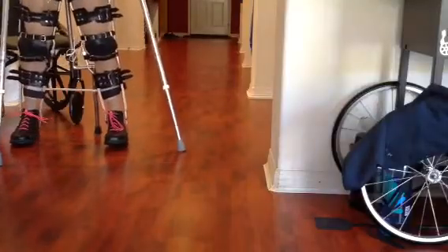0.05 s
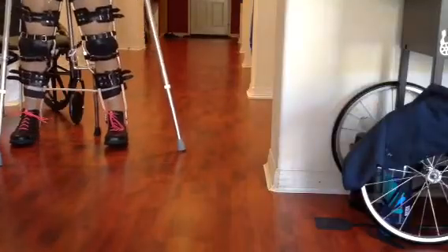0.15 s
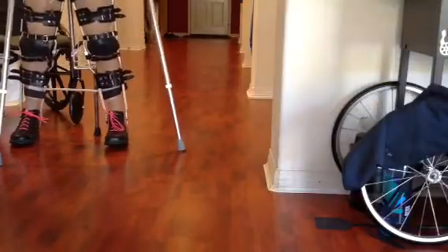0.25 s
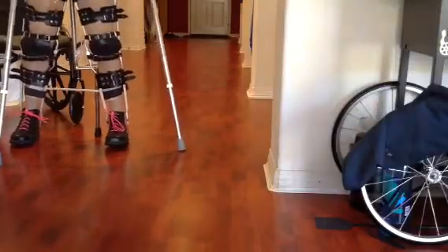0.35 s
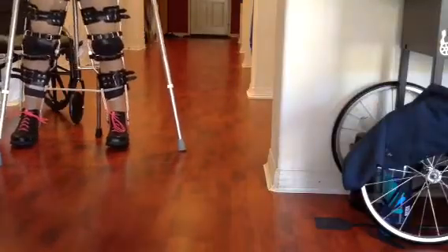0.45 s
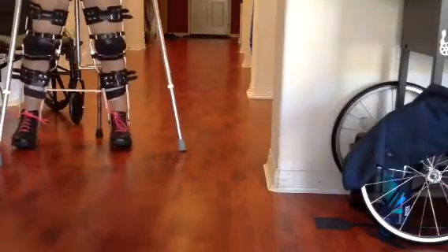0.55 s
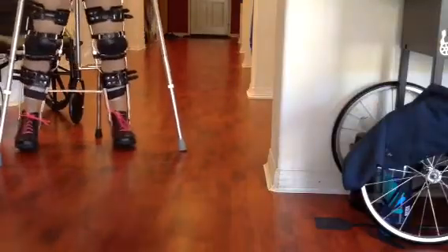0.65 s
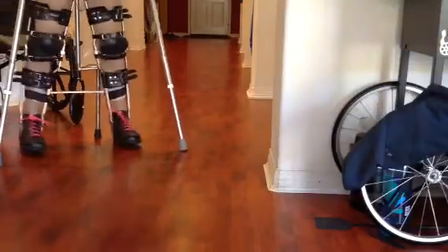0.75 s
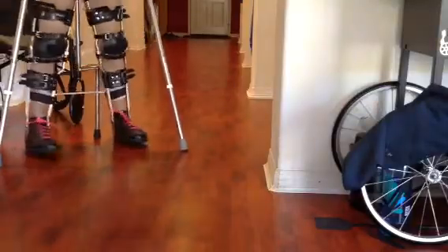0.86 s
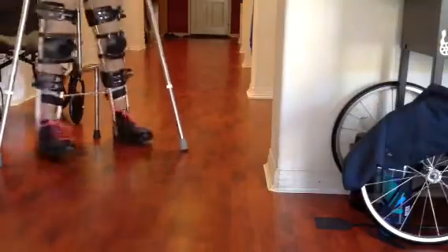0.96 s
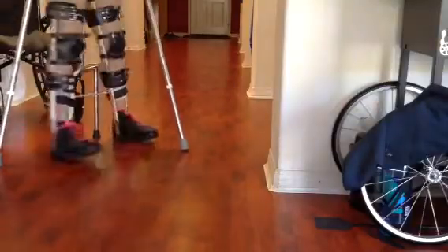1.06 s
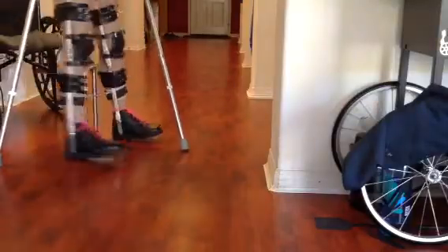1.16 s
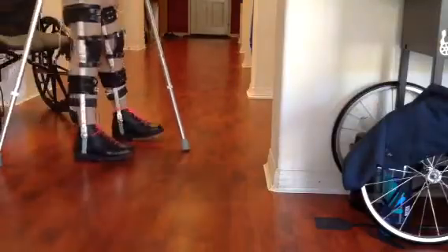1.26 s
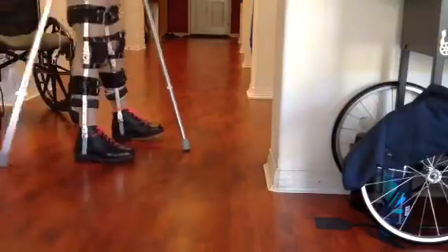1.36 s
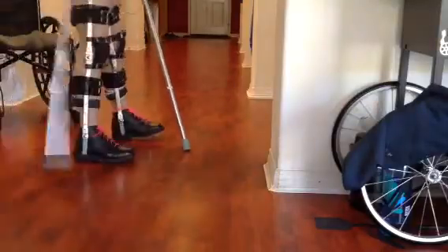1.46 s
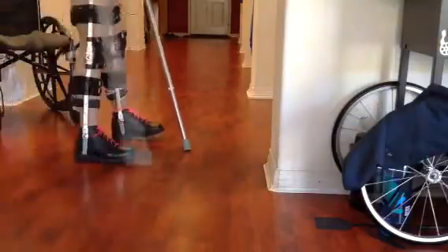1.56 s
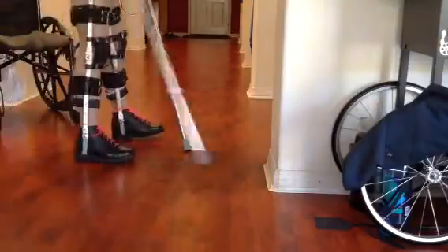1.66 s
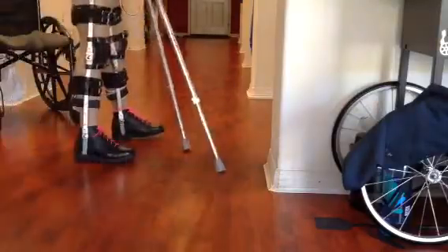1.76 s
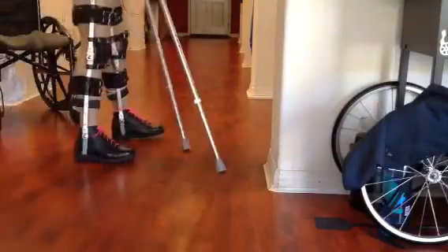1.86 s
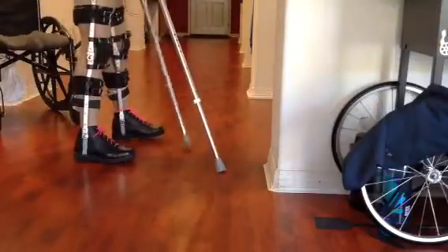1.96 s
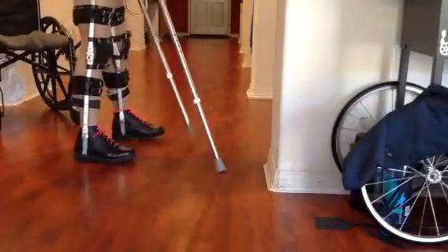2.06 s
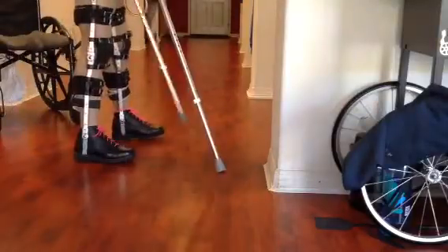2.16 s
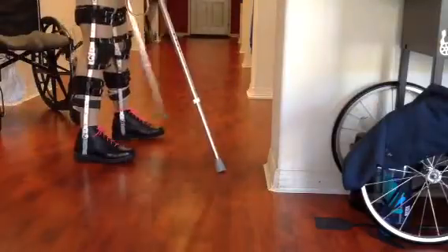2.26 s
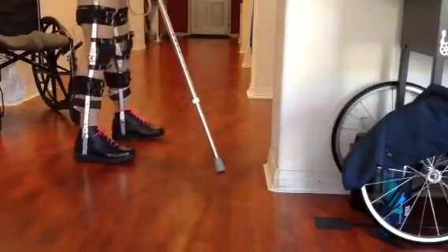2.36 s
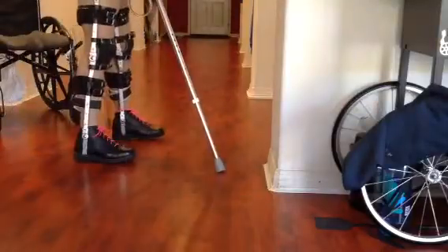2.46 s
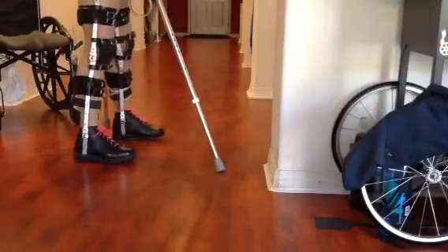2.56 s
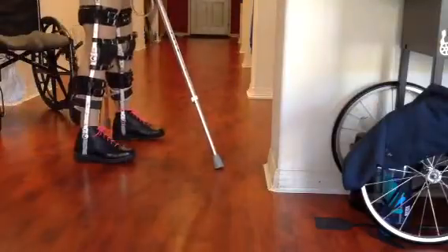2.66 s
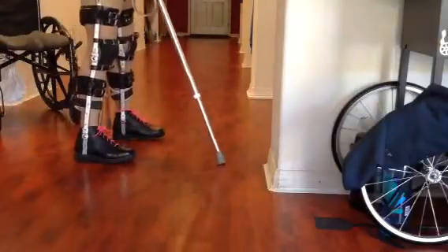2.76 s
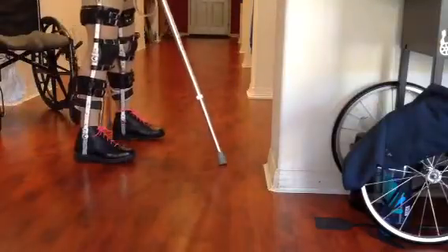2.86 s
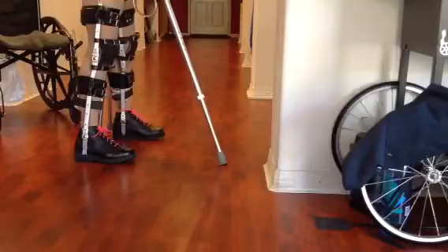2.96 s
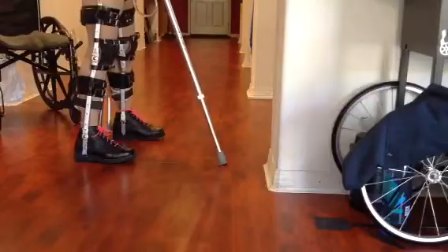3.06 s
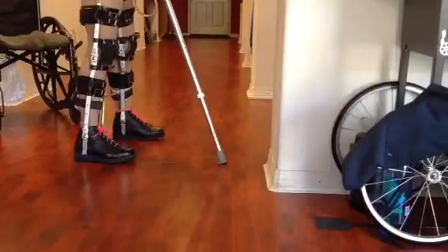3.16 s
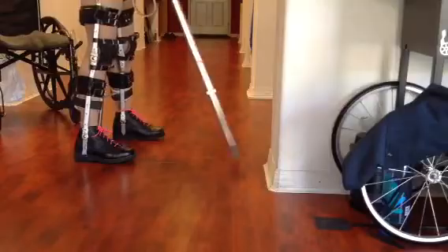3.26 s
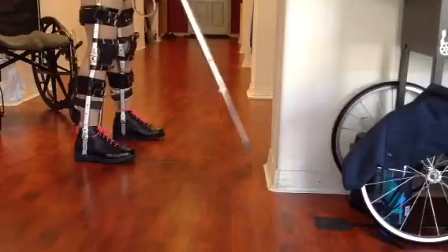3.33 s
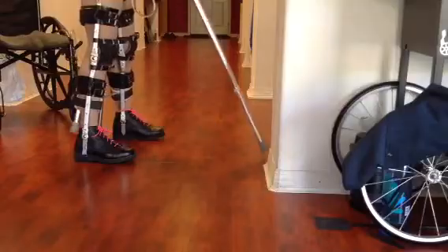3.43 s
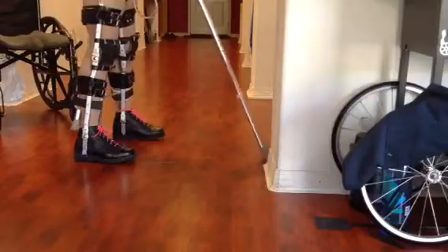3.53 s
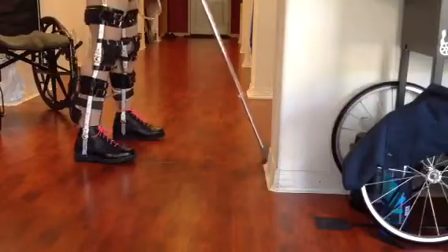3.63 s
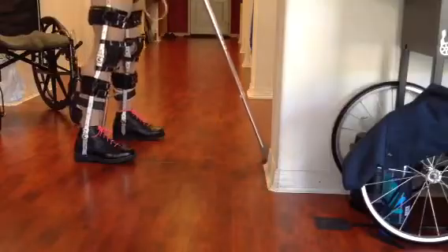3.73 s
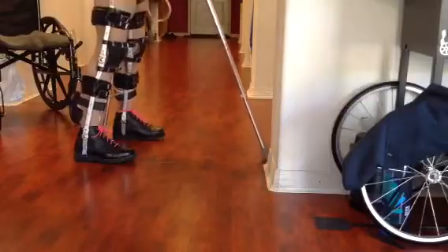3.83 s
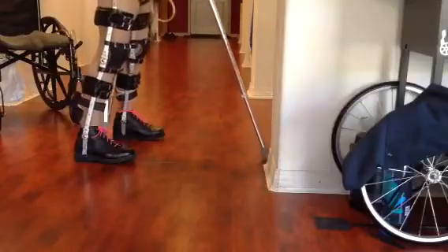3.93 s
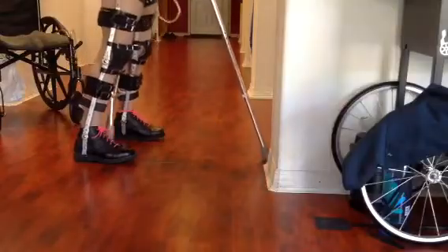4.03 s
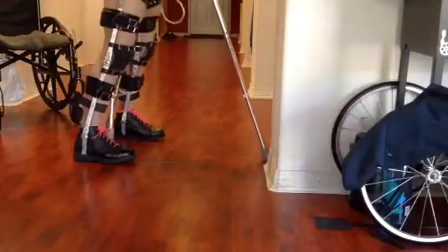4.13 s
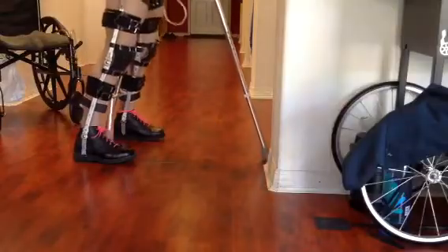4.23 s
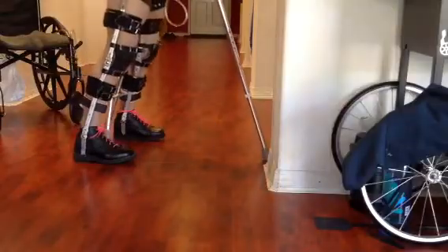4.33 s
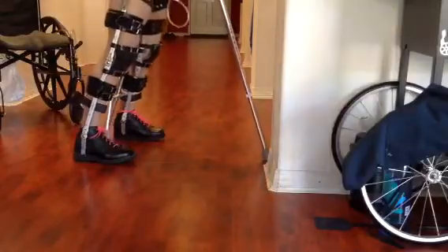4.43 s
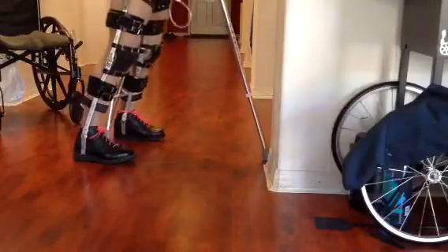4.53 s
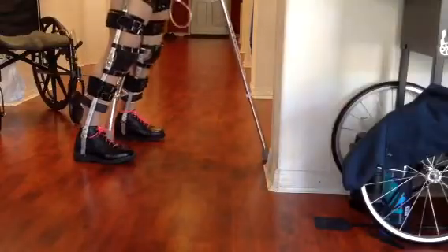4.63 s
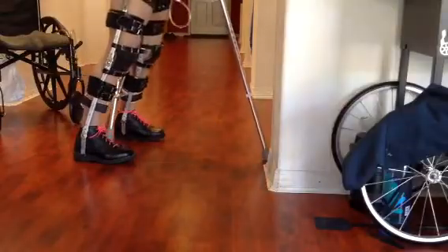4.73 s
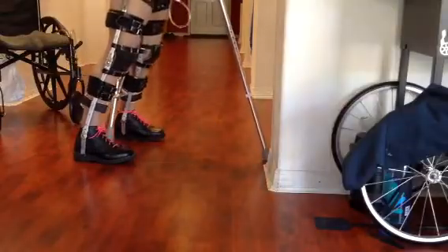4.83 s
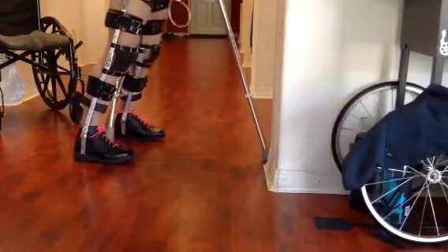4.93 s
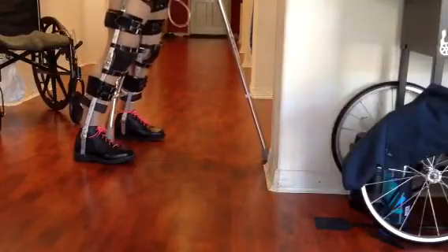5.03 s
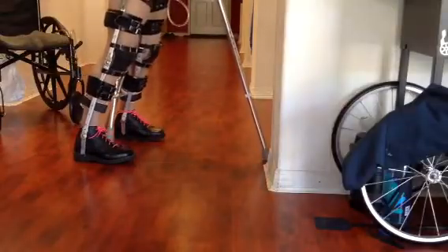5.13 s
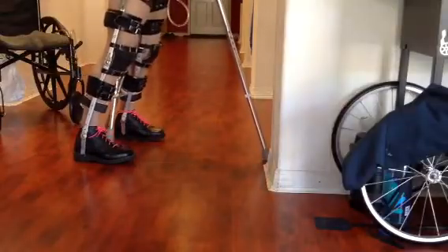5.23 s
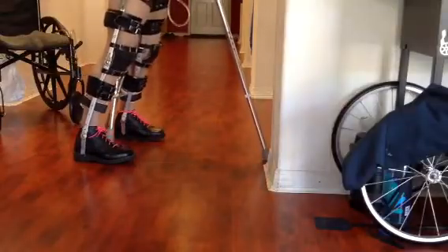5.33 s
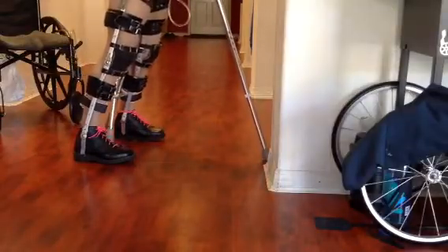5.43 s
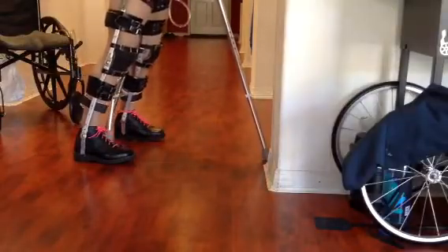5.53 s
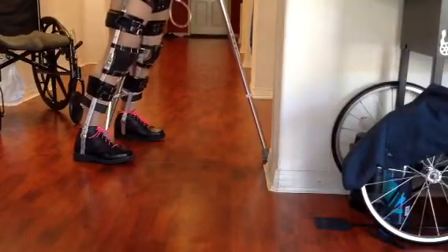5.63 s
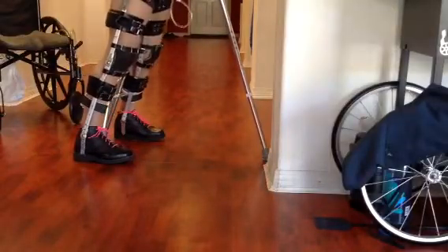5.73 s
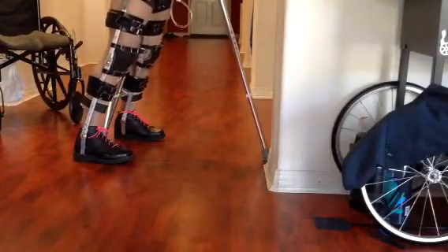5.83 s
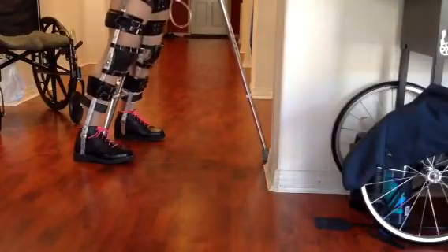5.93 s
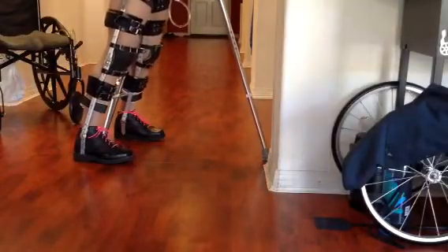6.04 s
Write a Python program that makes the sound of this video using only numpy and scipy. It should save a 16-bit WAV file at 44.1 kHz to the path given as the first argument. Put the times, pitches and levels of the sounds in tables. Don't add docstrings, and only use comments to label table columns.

```python
import sys
import numpy as np
from scipy import signal
from scipy.fft import rfft, irfft, next_fast_len
from scipy.io import wavfile
from scipy.ndimage import uniform_filter1d, map_coordinates

SR = 44100
rng = np.random.default_rng(int(sys.argv[2]) if len(sys.argv) > 2 else 0)


def gain_from_decibels(decibels):
    exponent = np.asarray(decibels, float) / 20
    return 10 ** exponent


def wav_record(signal):
    frames = np.transpose(np.atleast_2d(signal))
    bounded = np.clip(frames, -1, 1)
    quanta = np.round(bounded * 32767).astype(np.int16)
    wavfile.write(sys.argv[1], SR, quanta)


N = 268569


def unit(x):
    return x / np.sqrt(np.mean(x ** 2) + 1e-20)


def peak1(x):
    return x / np.abs(x).max()


def along(points, hz):
    f, v = np.transpose(points)
    return np.interp(np.log(hz + 1), np.log(f + 1), v)


def filtered(x, response):
    m = next_fast_len(len(x) + 8192)
    hz = np.fft.rfftfreq(m, 1 / SR)
    return irfft(rfft(x, m) * response(hz), m)[:len(x)]


def resonance(f, hz, width_hz):
    return 1j * f * width_hz / (hz * hz - f * f + 1j * f * width_hz)


def modes(table):
    def response(f):
        return sum((-1) ** k * gain_from_decibels(db) * resonance(f, hz, w) for k, (hz, w, db) in enumerate(table))
    return response


def add(track, s, sound):
    part = track[round(s * SR):][:len(sound)]
    part += sound[:len(part)]


# (frequency [Hz], t60 [s])
HALLWAY_T60 = [(150, 0.42), (500, 0.74), (1500, 0.69), (4000, 0.64), (9000, 0.58), (15000, 0.44)]


def hall(x, build_s=0.007):
    hz, t, z = signal.stft(rng.standard_normal(SR * 3 // 5), SR, nperseg=256)
    decay_db = -60 * t / along(HALLWAY_T60, hz)[:, None]
    tail = signal.istft(z * gain_from_decibels(decay_db), SR, nperseg=256)[1]
    tail = tail * (1 - np.exp(-(np.arange(len(tail)) / SR / build_s) ** 2))
    return signal.fftconvolve(x, tail / np.linalg.norm(tail))


# (frequency [Hz], level per Hz [dB])
HUM_COLOUR = [(24, -69), (40, -22.5), (161, 0), (320, -5), (780, -16.5), (1150, -18), (5660, -25),
              (15300, -25.5)]
# (frequency [Hz], level [dB])
FRIDGE_TONES = [(277, -71), (457, -87.5)]


def house():
    t = np.arange(N) / SR
    air = unit(filtered(rng.standard_normal(N), lambda f: gain_from_decibels(along(HUM_COLOUR, f))))
    drift = np.clip(map_coordinates(rng.standard_normal(60), [t * 8]), -1.5, 1.5)
    out = gain_from_decibels(-61.5) * air
    for hz, db in FRIDGE_TONES:
        out += gain_from_decibels(db + 3 * drift) * np.sin(2 * np.pi * hz * t + 1.2 * drift)
    return out


def load(s, held_s, rise_share):
    slacken_db_per_s = 263
    t = np.arange(N) / SR - s
    rise = np.sin(np.pi / 2 * np.clip(t / (rise_share * held_s), 0, 1)) ** 2
    return rise * gain_from_decibels(-slacken_db_per_s * np.maximum(t - held_s, 0))


def patchy(x, depth_db):
    z = signal.stft(x, nperseg=512)[2]
    field = uniform_filter1d(rng.standard_normal(z.shape), size=8, axis=0)
    field = uniform_filter1d(field, size=8, axis=1)
    return signal.istft(z * gain_from_decibels(depth_db * unit(field)), nperseg=512)[1][:N]


# (frequency [Hz], width [Hz], level [dB])
LEATHER_MODES = [(1100, 1200, -27), (1750, 1150, 29), (2820, 4500, -9)]
# (frequency [Hz], width [Hz], level [dB])
BUCKLE_MODES = [(2550, 550, 1), (4400, 900, 1), (5900, 800, -2), (8500, 2000, -10)]
# (time [s], held [s], creak level [dB], rasp re creak [dB], groan re creak [dB])
STRAP_STRAINS = [(0.0, 0.033, -66.5, 2, 3), (.322, 0.089, -68.5, -6, 2), (.446, 0.2, -66.5, -4.5, -1.5),
                 (0.802, 0.24, -68, -3.5, -3.5), (1.46, 0.15, -65, -3, -10), (2.672, 0.046, -69, -23, 5.5),
                 (3.43, 0.24, -62.5, 1.5, -7), (3.64, 0.018, -68, -19, -5), (3.8, 0.18, -62.5, -2.5, -2.5),
                 (4.248, 0.011, -58.5, 4.5, 6.5), (4.324, 0.025, -64.5, 9, 9), (4.53, 0.047, -62.5, 0, 4),
                 (4.66, 0.023, -62, 4.5, 3), (5.035, 0.027, -53.5, -4, -4), (5.878, 0.02, -64, -2, -4)]
STRAP_LEANS = [(3.237, 0.041, -59.5, 5.5, -10), (4.41, 0.041, -55, -0.5, 1), (4.756, 0.068, -42.5, 0, -10),
               (5.089, 0.061, -47, -1.6, -11.5), (5.17, 0.059, -46, -4.8, -13)]
# (time [s], held [s], level [dB])
CLOTH_BRUSHES = [(.05, .03, -77), (.6, .15, -70), (3.64, 0.015, -56.5), (4.29, 0.11, -61),
                 (4.66, 0.023, -65)]


def straps():
    slips_per_s, spread_db, fizz_db, hallway_db = 1400, 4, -19.5, 2
    sudden, slow = 0.093, 0.8
    sizes = gain_from_decibels(spread_db * np.clip(rng.standard_normal((4, N)), -2, 2)) * rng.choice([-1, 1], (4, N))
    slips = (rng.random(N) < slips_per_s / SR) * sizes

    levels = np.zeros((4, N))
    for rise_share, rows in [(sudden, STRAP_STRAINS), (slow, STRAP_LEANS)]:
        for s, held_s, creak_db, rasp_db, groan_db in rows:
            voice_db = creak_db + np.array([[0], [rasp_db], [groan_db], [fizz_db]])
            levels += gain_from_decibels(voice_db) * load(s, held_s, rise_share)
    for s, held_s, db in CLOTH_BRUSHES:
        levels[-1] += gain_from_decibels(db) * load(s, held_s, sudden)

    creak = lambda f: modes(LEATHER_MODES)(f) * resonance(f, 1700, 1900)
    rasp = lambda f: modes(BUCKLE_MODES)(f) * resonance(f, 3500, 15000)
    groan = lambda f: resonance(f, 820, 1180) ** 2
    fizz = lambda f: resonance(f, 12800, 8300) ** 2
    dry = np.zeros(N)
    for level, jerks, voice in zip(levels, slips, [creak, rasp, groan, fizz]):
        dry += level * unit(filtered(jerks, voice))
    return gain_from_decibels(-5) * patchy(dry + gain_from_decibels(hallway_db) * hall(dry)[:N], 1.4)


# (delay [s], level [dB])
NEAR_BOUNCES = [
    (.0008, 0),
    (.0016, -4),
    (.0026, -9),
]


def strike(out, s, db, response, hallway_db):
    impulse = 1.0 * (np.arange(SR // 20) == 0)
    hit = gain_from_decibels(db) * peak1(filtered(impulse, response))
    add(out, s, hit)
    for delay_s, bounce_db in NEAR_BOUNCES:
        late, vary = rng.standard_normal(2)
        add(out, s + delay_s * (1 + 0.12 * late), gain_from_decibels(bounce_db + 0.99 * vary) * hit)
    add(out, s, gain_from_decibels(hallway_db + 4) * hall(hit))


# (frequency [Hz], width [Hz], level [dB])
STEEL_PARTS = [(3230, 1000, -9.5), (4340, 1000, -12), (6120, 1900, -16), (8400, 1200, -34),
               (10650, 2100, -12), (14000, 1700, 1.5)]
# (time [s], click level [dB], sparkle re click [dB], hallway level [dB], steel colour [dB])
CRUTCH_PINS = [(0.1348, -38, 33, -2.5, 12), (0.3267, -51.5, 8, 8, -6), (0.4172, -46, 6, 0, -3),
               (1.1206, -21, -36, 10, 7), (1.846, -36, 27, -3.5, -14), (2.286, -59, -58, 16.5, -9),
               (2.666, -44.5, 16, -7, -15), (2.7743, -25, -1, 3, 0), (2.847, -25.5, 4, 4, 4),
               (3.0897, -49, -7, 9, -18), (3.793, -41, -15, 2, 0.1), (4.02, -27.5, 2.5, 4, -3),
               (4.6256, -46.5, 0, 11.5, -14)]
KNEE_LOCKS = [(0.448, -30, 3, 2, 3), (0.5402, -42.5, 1, 3.5, -7), (0.8118, -51, 1, 11.5, -13),
              (1.285, -21.5, 1.5, 11, -16), (1.3655, -31, -19, 5.5, 16), (1.7428, -50, -22, 6.5, -5),
              (1.9801, -30, -40, 1.5, -29), (2.0096, -36.5, -22, -14, -10), (3.238, -47, -13, -2, 6.5),
              (3.2583, -41, -30, 4, -4), (3.429, -44, -26, 5, -1), (3.6448, -31.5, -7, 1.5, -12),
              (3.825, -39, -3, 2, 4), (3.8591, -41, 13, 6, 5), (3.87, -41.5, -13, 2, 5),
              (4.0714, -21, 30.5, 7, -25), (4.5227, -49, -19, 15, 0), (5.53, -40.5, -4, 3.5, -11),
              (5.875, -59, -10, 13.5, 10), (5.9532, -22, 2, 3, -1), (5.977, -23.5, 22, -10, -25)]


def pins_and_locks():
    out = np.zeros(N)
    for crack_hz, rows in [(6600, CRUTCH_PINS), (4050, KNEE_LOCKS)]:
        for s, db, sparkle_db, hallway_db, steel_db in rows:
            def click(f):
                crack = resonance(f, crack_hz, 0.5 * crack_hz) + 1.8 * resonance(f, 3900, 6200)
                crack = crack * resonance(f, 3000, 8100)
                sparkle = gain_from_decibels(sparkle_db + 6.5) * resonance(f, 9800, 6200) ** 2
                steel = sum(gain_from_decibels(g) * resonance(f, hz, w) for hz, w, g in STEEL_PARTS)
                return (crack - sparkle) * (0.5 + gain_from_decibels(steel_db) * steel)
            strike(out, s, db - 0.7, click, hallway_db)
    return out


# (time [s], peak level [dB], frequency [Hz], hallway level [dB])
TUBE_PINGS = [(0.326, -48, 1710, -3), (2.7742, -43.5, 1750, 3), (3.258, -50, 2410, 2),
              (3.4262, -54, 2600, 11), (3.608, -46, 1750, -1), (3.642, -56, 1750, 4), (4.33, -41, 1730, -4),
              (4.371, -45, 1700, -1), (2.775, -40, 6000, -6), (2.8465, -34, 5960, -8),
              (3.2594, -48.5, 4570, 10), (3.793, -54, 1700, -1), (4.0214, -37, 5950, -5),
              (5.53, -58, 2800, 8), (5.9763, -36.5, 2590, 11), (5.978, -34, 9500, 8.5)]
TUBE_KNOCKS = [(0.3708, -50, 1890, 6.5), (0.4482, -43, 1600, 1), (0.808, -54.5, 1000, 9),
               (1.1216, -22, 1280, 6), (1.288, -25.5, 1650, 7), (1.4, -50, 1590, 2),
               (1.9815, -42.5, 1700, 8.5), (2.286, -53, 1630, -1), (2.848, -43.5, 1600, 6.5),
               (3.0903, -48.5, 1480, 7.5), (3.24, -48, 1770, 11), (3.793, -47.5, 1760, 6.5),
               (4.0207, -41.5, 1650, 5), (4.0638, -39.5, 2240, 22.5), (4.418, -43, 1810, 3),
               (4.4463, -43.5, 1530, 9), (4.6302, -49.5, 1480, 11.5), (4.6983, -45, 1720, 12.5),
               (5.474, -48.5, 1840, -3), (5.876, -61, 1640, 10), (5.9544, -24, 1370, 5.5)]
TUBE_BUMPS = [(1.8459, -43, 1300, 2), (3.4267, -53.5, 1530, 17), (3.555, -44, 1440, 9.5),
              (4.0706, -26, 2040, 12.5), (4.5431, -41.5, 960, 5.5), (4.665, -40.5, 1360, 8),
              (5.526, -38, 1750, 8.5), (5.977, -25, 1870, 5.5)]


def tubes():
    out = np.zeros(N)
    for width, rows in [(0.1, TUBE_PINGS), (0.44, TUBE_KNOCKS), (1, TUBE_BUMPS)]:
        for s, db, hz, hallway_db in rows:
            tube = lambda f: resonance(f, hz, width * hz) * resonance(f, 880, 4340)
            strike(out, s, db - 1.05, tube, hallway_db)
    return out


# (time [s], peak level [dB], board frequency [Hz], hallway level [dB], tap level [dB])
FLOOR_THUDS = [(0.802, -59.5, 290, 9.5, 3), (1.122, -35.5, 270, 1.5, 0.5), (1.833, -33.5, 454, -0.5, 2),
               (2.545, -51.5, 250, 2.5, -4), (2.865, -53, 209, -4, -11), (3.081, -42.5, 215, -2.5, -39),
               (3.585, -45.5, 453, 3, -10), (3.852, -55.5, 417, 11, -30), (4.07, -42.5, 420, 5, 0),
               (4.801, -58, 447, 10.5, -18), (5.53, -55.5, 284, -4, 7), (5.951, -41.5, 444, 5.5, -4.5)]


def thuds():
    out, t = np.zeros(N), np.arange(SR // 12) / SR
    push = t * np.exp(-t / 0.00032)
    for s, db, board_hz, hallway_db, tap_db in FLOOR_THUDS:
        def floor(f):
            board = resonance(f, board_hz, 0.65 * board_hz) ** 2 - 0.59 * resonance(f, 198, 95)
            return board - gain_from_decibels(tap_db - 0.5) * resonance(f, 543, 290) ** 2
        boom = gain_from_decibels(db + 3) * peak1(filtered(push, floor))
        add(out, s + 0.003, boom)
        add(out, s + 0.003, gain_from_decibels(hallway_db) * hall(boom))
    return out


BAR_HZ, PLATE_HZ, HINGE_HZ, RIVET_HZ, STIRRUP_HZ, BOARD_HZ = 12625, 12095, 14355, 15240, 8312, 457
# (time [s], frequency
# [Hz], level [dB], hold [s], t60 [s])
CLEAN_SINGS = [(1.12, BAR_HZ, -28.5, 0.068, 0.28), (3.853, BOARD_HZ, -57, 0.084, 0.2),
               (4.78, BOARD_HZ, -57.5, 0.045, 0.14)]
LOOSE_RINGS = [(1.122, PLATE_HZ, -43, .03, 0.76), (1.194, HINGE_HZ, -43, 0.023, 0.1),
               (1.284, PLATE_HZ, -32, 0.082, 0.36), (1.27, BAR_HZ, -57, .03, .2),
               (1.279, HINGE_HZ, -46, 0.036, 0.17), (1.298, RIVET_HZ, -53.5, 0.037, .1),
               (3.253, PLATE_HZ, -62, 0.086, 0.18), (3.259, BAR_HZ, -69, 0.051, .2),
               (4.066, STIRRUP_HZ, -41, 0.016, 0.48), (4.8, BAR_HZ, -67, .08, .3),
               (5.126, BAR_HZ, -70, .15, .3)]


def rings():
    out, t = np.zeros(N), np.arange(SR // 2) / SR
    for flutter, rows in [(0.03, CLEAN_SINGS), (0.75, LOOSE_RINGS)]:
        for s, hz, db, hold_s, t60 in rows:
            re, im = (unit(map_coordinates(row, [t * 160])) for row in rng.standard_normal((2, 200)))
            wobble = np.sqrt(1 - flutter) + np.sqrt(flutter / 2) * (re + 1j * im)
            wave = (wobble * np.exp(2j * np.pi * hz * t)).imag
            decay = gain_from_decibels(db - 60 * np.maximum(t - hold_s, 0) / t60)
            add(out, s, decay * (1 - np.exp(-t / 0.002)) * wave)
    return out


def scene():
    return (house() + straps() + pins_and_locks() + tubes() + thuds() + rings())[None]


def band_limit(x):
    return signal.sosfilt(signal.butter(12, 16470, fs=SR, output="sos"), x)


def record(dry):
    bass_cut = lambda f: (1j * f / (90 + 1j * f)) ** 3
    top_cut = lambda f: np.where(f < 15450, 1, gain_from_decibels(-32))
    heard = filtered(dry[0], lambda f: bass_cut(f) * top_cut(f))
    return band_limit(heard[None])


dry = scene()
out = record(dry)
wav_record(out)
```